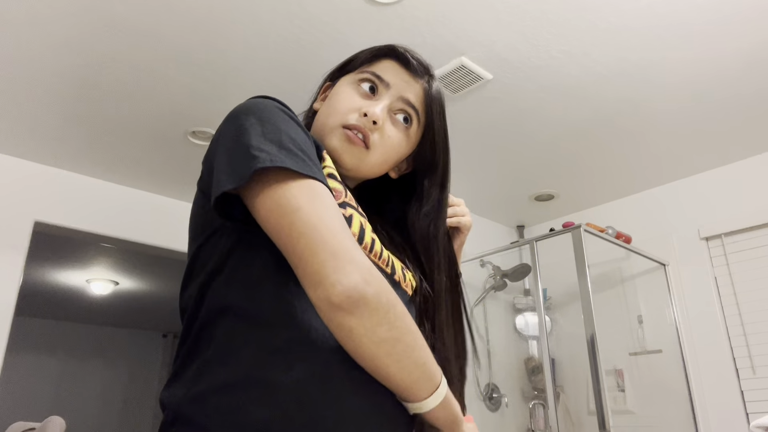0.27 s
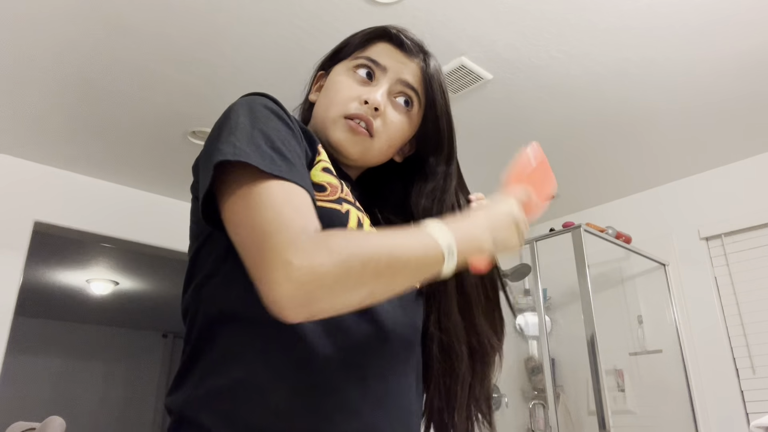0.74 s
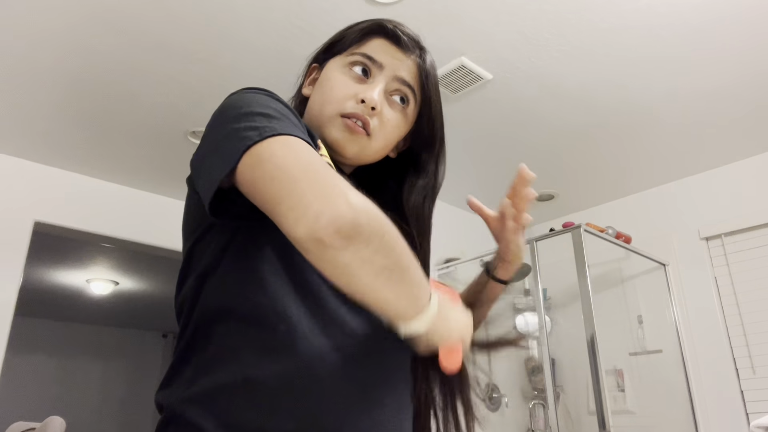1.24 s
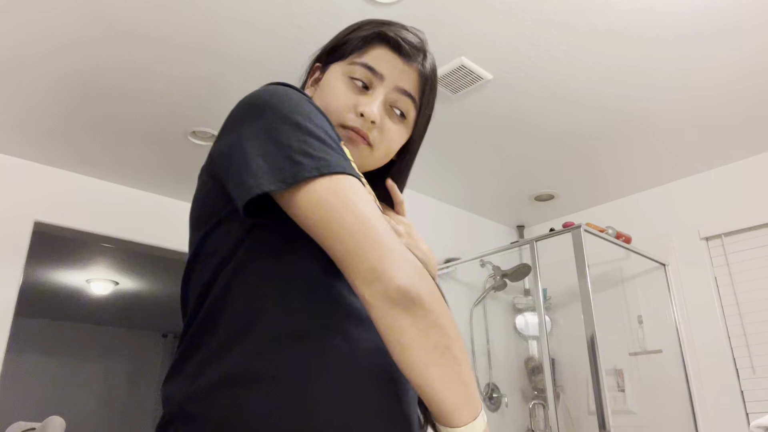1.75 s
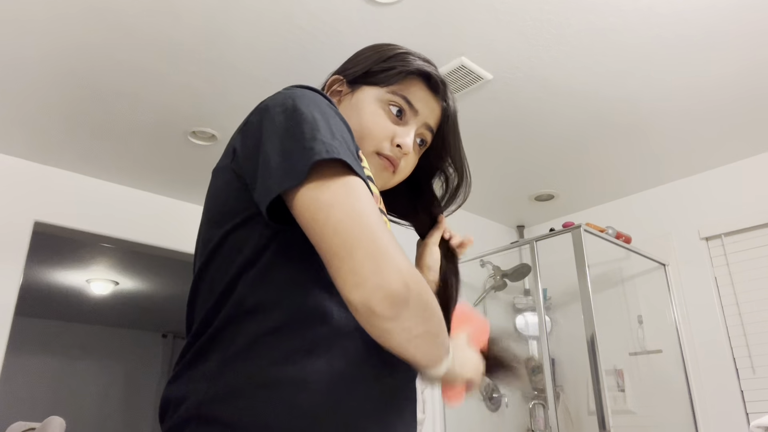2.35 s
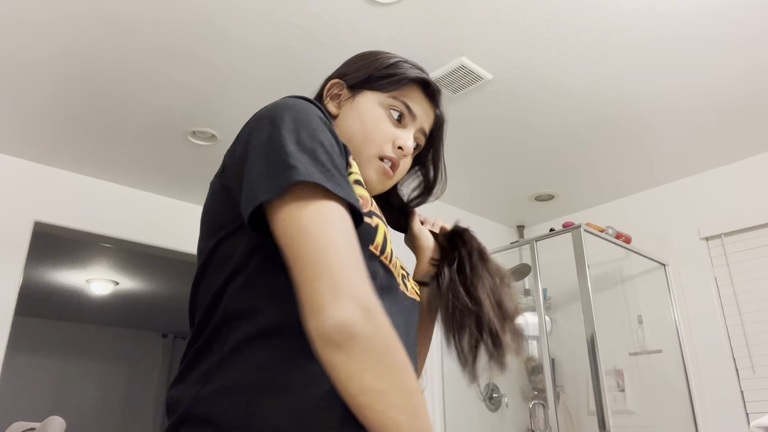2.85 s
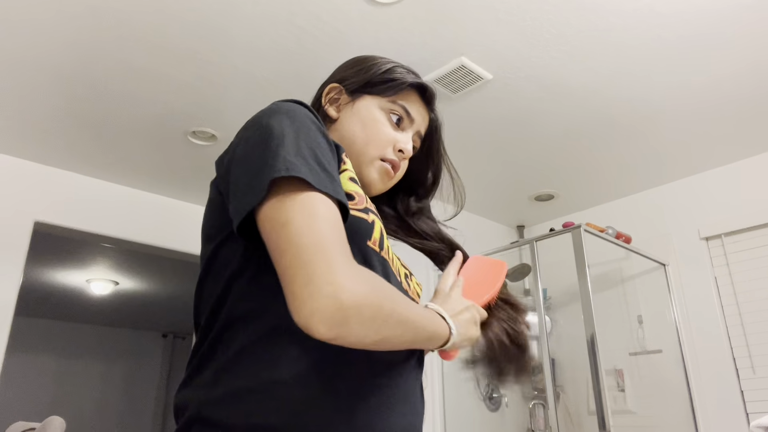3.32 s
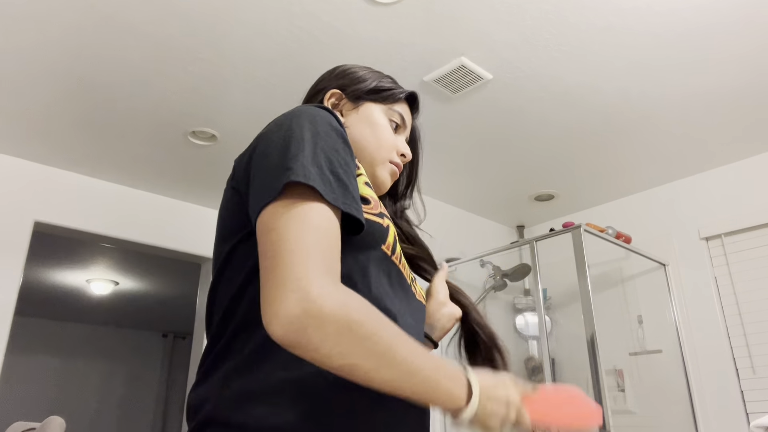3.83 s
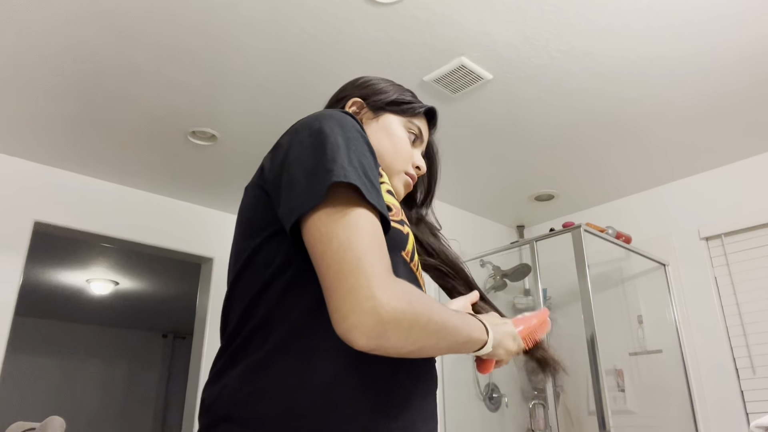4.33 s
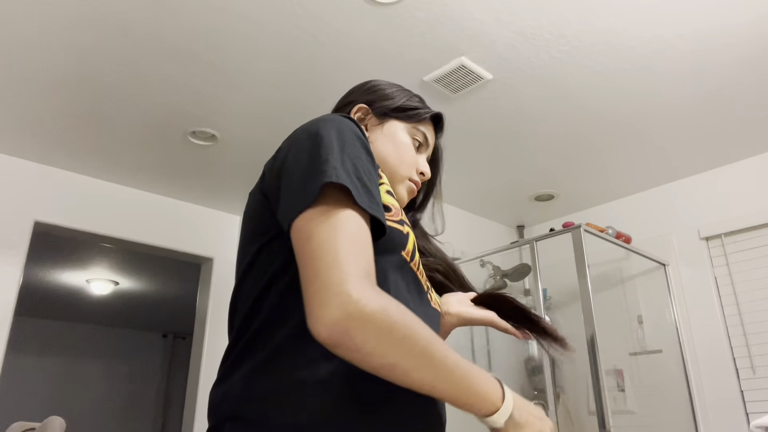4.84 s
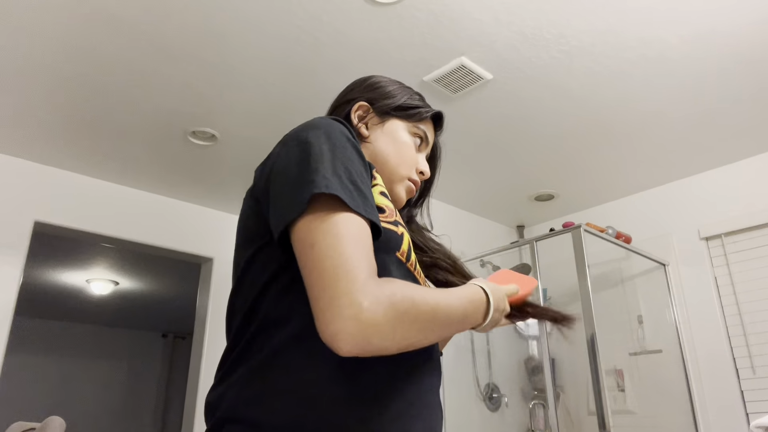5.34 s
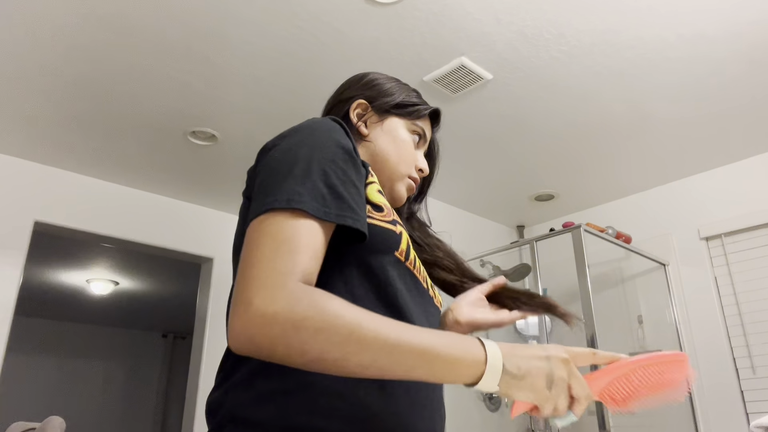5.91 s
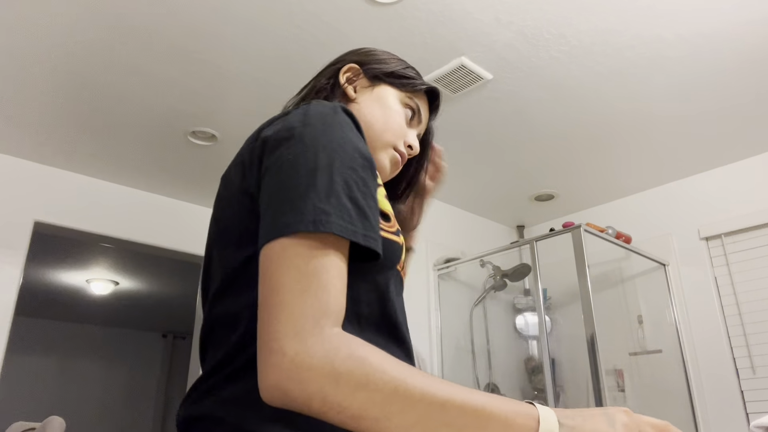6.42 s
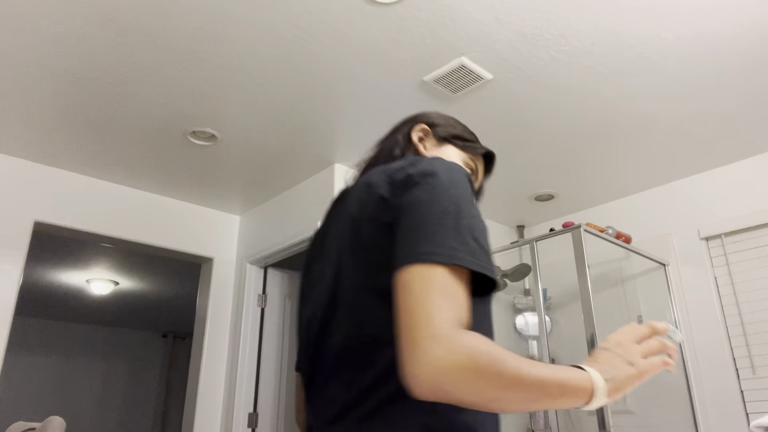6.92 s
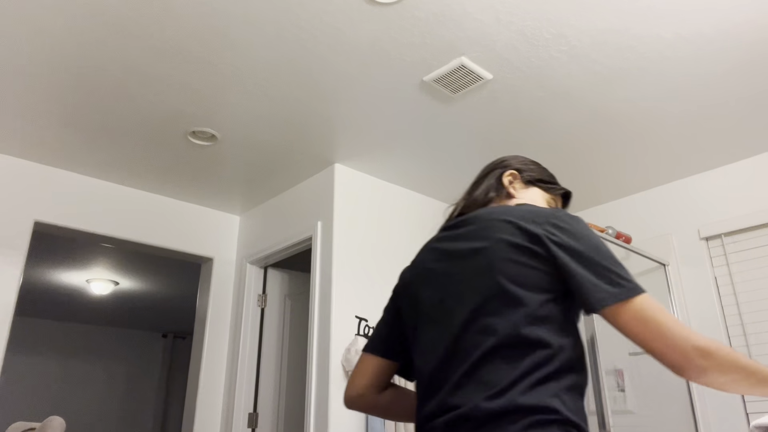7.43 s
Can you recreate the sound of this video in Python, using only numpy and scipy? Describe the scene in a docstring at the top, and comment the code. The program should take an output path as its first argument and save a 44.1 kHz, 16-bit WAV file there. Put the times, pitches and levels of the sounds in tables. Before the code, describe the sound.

In a tiled bathroom, ventilation gives a low, gently wavering rumble while someone brushes long hair near the microphones. Bristles swish and scratch through the strands in irregular pulls, clicking where they catch. The stronger early strokes give way to shorter ones, then the plastic brush gives one sharp, hollow knock. A few more strokes, soft rubbing and a low bump follow, all with a slight room echo.

```python
"""Brushing long hair in a bathroom

A hollow plastic hairbrush is pulled through long hair, close by. Hair slips over the bristles, shaking their
pad and hissing at their tips. Snags click and knock the hollow brush body, and the tiled walls echo. Behind it
all, the ventilation rumbles and booms at two wavering room tones."""
import sys
import numpy as np
from scipy import signal
from scipy.fft import rfft, irfft, next_fast_len
from scipy.io import wavfile
from scipy.ndimage import uniform_filter1d, map_coordinates

SR = 44100
rng = np.random.default_rng(int(sys.argv[2]) if len(sys.argv) > 2 else 0)


def to_wav(sig):
    """Store sig (one row per channel, or 1-D mono) as 16-bit WAV at the path in sys.argv[1].

    Samples outside -1..1 are clipped; the rate is SR.
    """
    pcm = np.clip(np.atleast_2d(sig), -1, 1) * 32767
    pcm = np.round(pcm).astype(np.int16)
    wavfile.write(sys.argv[1], SR, pcm.T)  # frames by channels


N = 338247


def amp(db):
    """Turn decibels into a number to multiply a sound by."""
    return 10 ** (np.asarray(db) / 20)


def unit(x):
    """Scale x to an average (rms) level of 1."""
    return x / np.sqrt(np.mean(x ** 2) + 1e-20)


def along(points, hz):
    """Read between the rows of a (frequency, value, ...) table, on a log frequency scale."""
    row_hz, *columns = np.transpose(points)
    return np.squeeze([np.interp(np.log(hz + 1), np.log(row_hz + 1), column) for column in columns])


def filtered(x, response):
    """Multiply each frequency in x by response(hz)."""
    size = next_fast_len(N + SR // 2)
    return irfft(rfft(x, size) * response(np.fft.rfftfreq(size, 1 / SR)), size)[..., :N]


def coloured(x, spectrum):
    """Shape the tone of x with a (frequency, level) table."""
    return filtered(x, lambda hz: amp(along(spectrum, hz)))


def ring(x, modes):
    """Let x shake an object that rings at its own frequencies (modes); narrow ones ring longer."""
    return filtered(x, lambda hz: sum(
        (-1) ** k * amp(db) * 1j * hz * width / (centre ** 2 - hz ** 2 + 1j * hz * width)
        for k, (centre, width, db) in enumerate(modes)))


def from_peak(t, peak_s, rise_s, fall_s):
    """Distance from a peak, counted in rise times before it and fall times after it."""
    return np.where(t < peak_s, (peak_s - t) / rise_s, (t - peak_s) / fall_s)


def flutter(rate, depth_db):
    """A gain that glides through `rate` random values a second."""
    knots = rng.standard_normal(int(N * rate / SR) + 4)
    return amp(depth_db * map_coordinates(knots, [np.arange(N) * rate / SR]))


def ventilation():
    """Low noise from the ventilation, swelling at two room tones near 70 and 97 Hz."""
    # tone of the rumble: (frequency [Hz], level [dB])
    spectrum = [(12, -67.5), (20, -39), (37, -22), (54, -6.5), (76, -12), (103, -7.5), (175, -19),
                (245, -26.5), (306, -32), (342, -35), (581, -50.5), (881, -61), (1300, -53.5),
                (2150, -67.5), (15500, -72.5)]
    # swells of the room tones: (peak time [s], pitch [Hz], level [dB], rise [s], fall [s])
    booms = [(.07, 66.1, -34, 0.14, 0.13), (.31, 69.9, -34.5, 0.045, 0.043),
             (.45, 72.26, -33.5, 0.056, 0.11), (.795, 69.5, -29, 0.055, 0.043), (.88, 91, -35, 0.019, .04),
             (.97, 72.5, -34.5, 0.083, 0.036), (1.19, 93.2, -35.5, 0.042, 0.035),
             (1.23, 71.05, -38, 0.054, .04), (1.46, 64.5, -40.5, 0.022, .03),
             (1.5, 96.3, -35, 0.033, 0.072), (1.97, 71.1, -30.5, 0.079, 0.058),
             (2.09, 71.86, -35, 0.034, 0.13), (2.25, 97, -36.5, 0.023, 0.033),
             (2.31, 72, -35.5, 0.045, 0.036), (2.44, 72, -39, .04, 0.031), (2.7, 97.8, -37, 0.034, 0.11),
             (2.71, 68, -41, .04, .04), (3.085, 92.6, -36.5, 0.021, 0.026), (3.285, 94, -39, 0.065, 0.088),
             (3.55, 94.2, -37, 0.026, 0.026), (3.59, 66.5, -38, .04, 0.038), (3.855, 71.1, -31, 0.046, .07),
             (4.0, 72, -35, 0.045, 0.053), (4.12, 73, -34.5, 0.043, 0.055),
             (4.628, 70, -40.5, 0.021, 0.026), (4.635, 99.7, -43, 0.041, 0.023),
             (4.919, 67.6, -40.5, .022, 0.019), (5.003, 98, -40, .02, 0.029), (5.065, 68.9, -35, .07, .06),
             (5.22, 68.5, -42, 0.051, 0.094), (5.559, 68.6, -37, 0.047, .07),
             (5.839, 104.8, -36.5, .026, 0.044), (5.965, 70.5, -29.5, 0.044, 0.05),
             (6.1, 71.5, -35.5, .07, 0.088), (6.239, 65, -34.5, 0.045, 0.022),
             (6.268, 99, -34, .034, 0.028), (6.583, 68.8, -42, .04, 0.067), (6.698, 68.9, -43, 0.051, .038),
             (6.754, 100.5, -34, 0.031, 0.029), (7.04, 70, -31.5, 0.052, 0.068),
             (7.148, 95, -35.5, 0.013, 0.025), (7.242, 72.4, -36.5, 0.031, 0.048),
             (7.467, 67, -34.3, 0.032, 0.031), (7.479, 97.1, -33.5, 0.067, 0.028),
             (7.573, 97.3, -35, 0.034, .06)]
    drop_db = 5.5  # lost over one rise or fall time
    t = np.arange(N) / SR
    out = amp(-44) * flutter(7.4, depth_db=2.5) * unit(coloured(rng.standard_normal((2, N)), spectrum))
    for peak_s, hz, db, rise_s, fall_s in booms:
        span = slice(max(round((peak_s - 4 * rise_s) * SR), 0), round((peak_s + 4 * fall_s) * SR))
        swell = amp(db - drop_db * from_peak(t[span], peak_s, rise_s, fall_s) ** 2)
        out[0, span] += np.sqrt(2) * swell * np.sin(2 * np.pi * hz * t[span])
    return out


def tile_echo(x):
    """The tiled room answers x with an echo in which each frequency fades at its own speed."""
    # length of the echo: (frequency [Hz], time to fade by 60 dB [s])
    fade_times = [(250, 0.42), (700, 0.39), (2000, 0.45), (4000, 0.3), (7000, 0.2), (12000, 0.34)]
    hz, t, noise = signal.stft(rng.standard_normal((2, SR // 2)), SR, nperseg=256)
    tail = signal.istft(noise * amp(-60 * t / along(fade_times, hz)[:, None]), SR, nperseg=256)[1]
    delayed = np.pad(x, ((0, 0), (150, 0)))
    return signal.fftconvolve(delayed, tail / np.linalg.norm(tail[0]), axes=1)[:, :N]


def handling_scrapes():
    """Handling makes scrapes and thuds: noise in one band, quick to rise and slower to fade."""
    # scrapes and thuds: (start [s], length [s], frequency [Hz], width [Hz], level [dB])
    scrapes = [(.01, 0.23, 153, 80, -52), (3.444, 0.094, 690, 111, -44), (3.573, .08, 1190, 269.4, -43),
               (1.836, 0.13, 2800, 326, -77), (6.26, .12, 1880, 450, -59.5),
               (6.312, 0.14, 682, 55.6, -53.5), (6.509, 0.32, 2820, 500, -72), (6.8, .2, 276.2, 214, -50),
               (6.893, 0.035, 651, 110.6, -54.5), (6.992, 0.16, 1310, 148.7, -66), (7.45, .1, 139, 92, -34),
               (7.436, .1, 262, 129.6, -50), (7.446, 0.094, 6300, 1390, -55)]
    out = np.zeros((2, N + SR))
    for start_s, length_s, hz, width_hz, db in scrapes:
        count = round(length_s * SR)
        progress = np.arange(count) / (length_s * SR)
        envelope = np.minimum(8 * progress, 1) * np.sqrt(1 - progress)
        edges_hz = [max(hz - width_hz / 2, 20), hz + width_hz / 2]
        band = signal.butter(2, edges_hz, "band", fs=SR, output="sos")
        rub = unit(signal.sosfilt(band, rng.standard_normal((2, SR // 2))))[:, -count:]
        out[:, round(start_s * SR):][:, :count] += amp(db) * rub * envelope
    return out[:, :N]


def hair_snags():
    """Each snag makes a short click and a soft blow that rings the hollow back of the brush."""
    # snags and bumps: (time [s], relative click level [dB], relative knock level [dB], click pitch [Hz])
    snags = [(0.1327, -47, -50, 3090), (0.2864, -48, -49, 3060), (0.7545, -61.5, -77, 2500),
             (1.3325, -42.5, -60, 3880), (1.405, -38.5, -56, 2950), (2.2015, -52, -52, 2970),
             (2.259, -52.5, -54, 2760), (2.527, -47, -66, 5256), (2.616, -42, -48, 2953),
             (2.6995, -31.5, -40, 4870), (3.3074, -54.5, -53, 3090), (3.4383, -60, -53, 3330),
             (3.481, -49.5, -49, 2620), (4.0894, -50.5, -64, 2730), (4.1949, -52, -45, 5000),
             (4.3994, -54, -51.5, 2690), (4.4692, -44.5, -46.5, 2880), (4.6409, -77, -54, 2501),
             (4.7326, -42, -54.5, 2580), (4.8785, -30, -17.5, 2505), (5.3263, -58.5, -60, 2590),
             (5.4168, -54.5, -58.5, 3060), (5.4396, -52.5, -58.5, 4683), (6.3559, -64, -51, 2770),
             (6.8679, -55.5, -54.5, 3500), (6.991, -62.5, -49.5, 2880), (7.443, -50.5, -63, 3974)]
    # ringing of the hollow back: (frequency [Hz], width [Hz], level [dB])
    back_modes = [(302, 210, -8), (398, 60, 3), (690, 66, 10), (750, 190, -0.5), (870, 21, 2),
                  (985, 88, -3), (1190, 84, -3), (1370, 70, -3), (1495, 42, -2.5), (2070, 600, -15),
                  (3200, 1800, -23.5)]
    clicks, blows = np.zeros((2, N + SR)), np.zeros(N)
    t = np.arange(SR // 20) / SR
    for time_s, click_db, knock_db, hz in snags:
        at = round((time_s + .0018) * SR)  # the peak comes just after the first contact
        snap = amp(-60 * t / 0.006) * rng.standard_normal((2, len(t)))  # fades by 60 dB in 6 ms
        click = signal.lfilter(*signal.iirpeak(hz, Q=1.2, fs=SR), snap) + 0.28 * snap
        clicks[:, at:][:, :len(t)] += amp(click_db + 5.5) * click / np.abs(click).max()
        blows[at] = amp(knock_db + 39)
    soft_blows = filtered(blows, lambda hz: (2000 / (2000 + 1j * hz)) ** 2)  # each lasts under 1 ms
    return clicks[:, :N] + ring(soft_blows, back_modes) * [[1], [-.6]]


def hair_slips(rate, spread_db, rubbing):
    """Two streams of tiny slips of uneven size, about `rate` a second, over finer rubbing noise."""
    when = rng.random((2, N)) < rate / SR
    size = amp(spread_db * rng.standard_normal((2, N))) * rng.choice([-1, 1], size=(2, N))
    return unit(unit(when * size) + rubbing * rng.standard_normal((2, N)))


def patchy(x, depth_db):
    """Patches of the sound grow louder and softer as other bristles and strands take over."""
    spectra = signal.stft(x, nperseg=256)[2]
    patches = uniform_filter1d(rng.standard_normal(spectra.shape[1:]), size=3, axis=0)  # over frequency
    patches = uniform_filter1d(patches, size=8, axis=1)  # over time
    return signal.istft(spectra * amp(depth_db * unit(patches)), nperseg=256)[1][:, :N]


def brush_strokes():
    """Coarse slips shake the bristle pad; fine slips and scattered ticks hiss at the bristle tips."""
    # pulls through the hair, with relative levels: (peak time [s], rise [s], fall [s], low pad [dB],
    # high pad above low pad [dB], hiss [dB], fizz above hiss [dB], sheen [dB])
    strokes = [ (0.07, 0.13, .1, -49, -5, -64.5, 2, -58.5),
               (0.138, 0.024, 0.076, -44.5, -2, -64, -1.5, -63.5),
               (0.22, .1, 0.16, -68, -3, -72.5, 2.5, -67), (0.292, .015, 0.12, -50, -7.5, -65, -1, -60.5),
               (0.47, 0.34, 0.09, -81, -4.5, -71, 5, -65.5),
               (0.8, 0.059, 0.063, -68, -13.5, -94.5, 6, -101),
               (1.02, 0.19, 0.51, -62, -6, -80.5, 2.5, -70.5),
               (1.18, 0.22, 0.15, -60.5, -13, -76.5, 2, -66),
               (1.33, 0.12, 0.087, -59.5, -4, -65.5, -5.5, -64),
               (1.408, 0.0073, 0.11, -56.5, 9.5, -59, -15, -65.5),
               (1.456, .08, 0.17, -47, -3.5, -60, -5, -62), (1.64, 0.056, 0.055, -55.5, -4, -66, 2, -69),
               (1.668, 0.017, 0.094, -47.5, 3.5, -56, -3.5, -61.5),
               (1.692, .03, 0.061, -37.5, -12, -51.5, -5.5, -57), (1.88, .2, 0.28, -66, -4, -80, 0, -74),
               (2.136, .15, 0.078, -79, -3, -77, -1, -68.5),
               (2.204, 0.022, 0.067, -51.5, -5, -68.5, 0, -63.5),
               (2.263, .015, 0.26, -42, -5, -58.5, -5, -57),
               (2.372, 0.14, 0.089, -36, -6.5, -52, -4.5, -51.5),
               (2.45, 0.12, 0.12, -60, 3.5, -60.5, -4, -61),
               (2.614, 0.013, 0.081, -50.5, -1, -75, 6.5, -63.5),
               (2.685, .04, 0.033, -49, -6, -67, -3, -67),
               (2.704, .008, 0.056, -38.5, -4, -50.5, -15, -60.5),
               (2.78, 0.11, 0.13, -62.5, 1, -59.5, 0.3, -56.5), (2.885, .03, 0.14, -71, -3, -67, 6.5, -59),
               (2.94, 0.15, .11, -70.5, -1.5, -68.5, 4, -59),
               (3.18, 0.28, 0.21, -67, -7.5, -88, -10, -87.5),
               (3.307, 0.016, 0.16, -53.5, -3.5, -67, 0, -58.5),
               (3.442, .012, 0.067, -55.5, -6, -79, -2.5, -76), (3.484, .015, .1, -53, 4.5, -64, -5, -66.5),
               (3.556, 0.13, 0.11, -45, -4, -60, -4.5, -58), (3.63, 0.18, 0.19, -62.5, 0.5, -64, 3.5, -56),
               (3.85, 0.32, .07, -66.5, -16, -75.5, 4, -69), (3.976, 0.1, .08, -68, -14, -100, 2, -105),
               (4.093, .01, .07, -56, -2.5, -67.5, -3, -62), (4.17, 0.043, .05, -55, 0, -67.5, -6, -77),
               (4.2, .012, .05, -54, -3, -67, -4, -71.5), (4.246, .12, 0.048, -53.5, -3.5, -69, -6.5, -71),
               (4.38, .07, 0.21, -58.5, -5, -77, -8, -71.5), (4.42, .06, 0.061, -54, -3.5, -71.5, -4, -72),
               (4.473, 0.015, 0.11, -51.5, 1, -68, -5.5, -69.5),
               (4.535, .1, .03, -60.5, -2.5, -73.5, -1.5, -77),
               (4.715, 0.039, 0.051, -55.5, -1.5, -74.5, -7, -80),
               (4.735, 0.011, 0.13, -49, 4, -64.5, -2.5, -66.5),
               (4.855, 0.038, .02, -59.5, -10.5, -78, -5, -82),
               (5.327, .01, 0.061, -61.5, -2, -71, -9.5, -69),
               (5.424, .06, 0.12, -55, -0.5, -66.5, -18, -70.5),
               (5.47, .08, 0.039, -60.5, 1, -72.5, -5.5, -71),
               (5.604, 0.088, 0.11, -49.5, -1.5, -63, -24, -77.5),
               (5.668, 0.13, 0.046, -53.5, -5.5, -67, -6, -68.5),
               (5.992, .04, .08, -73.5, 6.5, -76.5, -3, -70), (6.12, .07, 0.14, -73.5, -3, -60.5, -6, -76),
               (6.198, 0.17, 0.1, -64, 4.5, -61.5, -3.5, -75.5),
               (6.31, .15, 0.24, -54, -11, -73.5, -17, -79.5), (6.41, 0.035, .12, -60, -4, -70, -1, -72),
               (6.47, 0.13, 0.14, -58, -6, -69.5, -3, -71.5), (6.68, 0.23, 0.3, -69, -10, -81, -3.5, -78.5),
               (6.8, .015, .15, -67, -4, -73, -4, -77.5), (6.88, 0.087, 0.19, -58.5, -12, -69, -0.5, -66),
               (6.992, 0.021, 0.12, -58, 8, -61.5, -3, -67),
               (7.15, 0.078, 0.12, -69.5, -2.5, -75.5, -1.5, -75.5),
               (7.246, 0.11, 0.063, -90, 5, -93, 4, -70.5), (7.452, 0.011, .08, -63, -4, -62.5, 6.5, -63),
               (7.485, 0.038, 0.091, -65, 3.5, -55.5, 1, -62),
               (7.612, 0.087, 0.13, -65.5, -5.5, -71, -4.5, -71.5)]
    # low and high ringing of the bristle pad: (frequency [Hz], width [Hz], level [dB])
    low_modes = [(352.7, 55, -6), (500.4, 28.6, -0.5), (575.6, 22, 0), (680, 25, 2.5), (805, 54, -4),
                 (884, 87, -8)]
    high_modes = [(1047, 89, -2), (1269, 164, -7), (1448, 150, -9.5), (1930, 680, -18)]
    # three bands of noise from the bristle tips, lowest first: (frequency [Hz], level [dB])
    hiss_band = [(1300, -23.5), (2000, -8), (2700, -4), (3800, -2.5), (4900, -5.5), (6000, -39.5)]
    fizz_band = [(4200, -30), (5200, 0), (7000, -3), (8800, -3), (9700, -6), (10500, -9), (11400, -12),
                 (12400, -40)]
    sheen_band = [(10400, -40), (11500, -9), (12500, -2), (13800, 0), (15800, -3)]
    drop_db, roundness = 19.5, 1.174  # loss over one rise or fall time; 1 = pointed peak, 2 = rounded
    grid = np.arange(0, N, 32)  # loudness is worked out every 32 samples
    power = 0
    for peak_s, rise_s, fall_s, low_db, high_db, hiss_db, fizz_db, sheen_db in strokes:
        levels = amp([low_db, low_db + high_db, hiss_db, hiss_db + fizz_db, sheen_db])
        swell = amp(-drop_db * from_peak(grid / SR, peak_s, rise_s, fall_s) ** roundness)
        power = power + np.outer(levels, swell) ** 2
    low, high, hiss, fizz, sheen = (np.interp(np.arange(N), grid, level) for level in np.sqrt(power))
    coarse = patchy(hair_slips(400, spread_db=3, rubbing=0.94), depth_db=2.5)
    fine = patchy(hair_slips(900, spread_db=2, rubbing=2.4), depth_db=2)
    fine += amp(-17.5) * hair_slips(30, spread_db=2, rubbing=0)  # scattered ticks
    pad = low * unit(ring(coarse, low_modes)) + high * unit(ring(coarse, high_modes))
    tips = (hiss * unit(coloured(fine, hiss_band))
            + fizz * unit(coloured(fine, fizz_band))
            + sheen * unit(coloured(fine, sheen_band)))
    # both flutter as the hair catches and lets go
    return amp(-0.5) * flutter(60, depth_db=2) * pad + amp(2.5) * flutter(30, depth_db=1.63) * tips


def scene():
    """Brush, echo and ventilation, as two sound fields to be mixed into left and right."""
    rubbing = brush_strokes() + handling_scrapes()
    snags = hair_snags()
    echo = tile_echo(amp(-8) * rubbing + amp(-3) * snags)  # the brush is close, so the echo is weaker
    return rubbing + snags + echo + ventilation()


def record(dry):
    """Left and right share the first field, take the second with opposite signs and cut the top."""
    # the stereo image: (frequency [Hz], left-right likeness [0 to 1], left ahead by [cycles], left louder by
    # [dB])
    stereo_image = [(40, 1, 0, 2), (110, .998, 0, 2.2), (250, .93, 0, 2.5), (550, .3, -.2, 0),
                    (1200, .3, 0, -1), (4500, .25, .3, .5), (6300, .6, .2, 2), (7200, .9, .08, .5),
                    (7600, 1, 0, 0), (8600, 1, 0, 0), (9400, .65, -.25, 0), (10150, 1, -.5, 0),
                    (11500, 1, -.5, 0), (12200, .6, -.75, 0), (12900, 1, -1, 0), (14100, 1, -1, 0),
                    (14700, .65, -1.25, 0), (15300, 1, -1.5, 0)]
    top_hz = 15760
    size = next_fast_len(N + SR // 2)
    hz = np.fft.rfftfreq(size, 1 / SR)
    likeness, lead_cycles, balance_db = along(stereo_image, hz)
    angle = np.arccos(np.clip(likeness, -1, 1)) / 2
    shared, opposed = rfft(dry, size) * [np.cos(angle), np.sin(angle)]
    shift = np.exp(1j * np.pi * lead_cycles) * amp(balance_db / 2)  # each side takes half
    left, right = (shared + opposed) * shift, (shared - opposed) / shift
    return irfft(np.array([left, right]) * (hz < top_hz), size)[:, :N]


dry = scene()
out = record(dry)
to_wav(out)
```